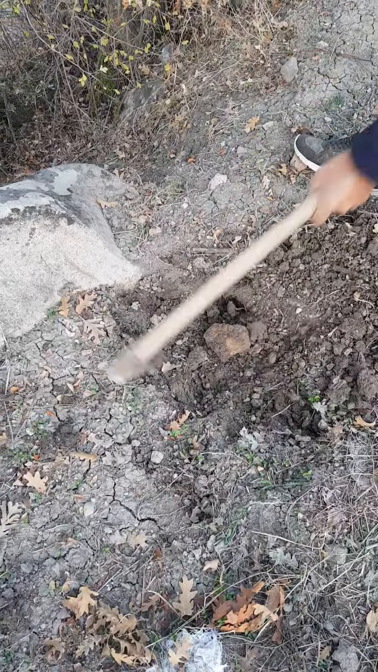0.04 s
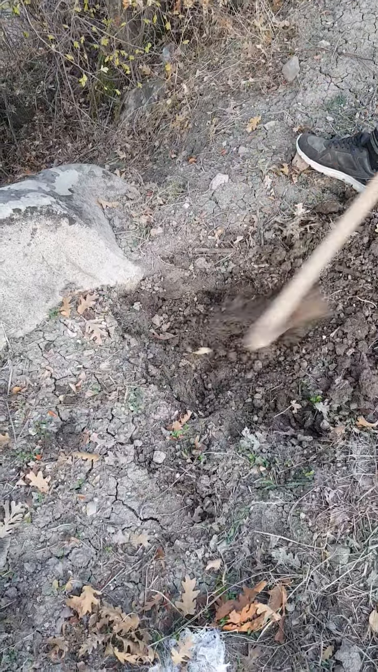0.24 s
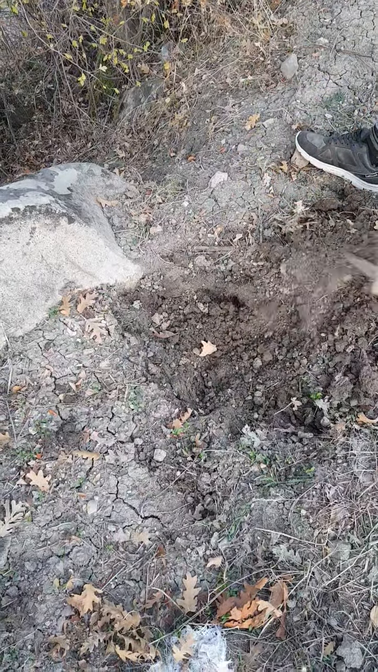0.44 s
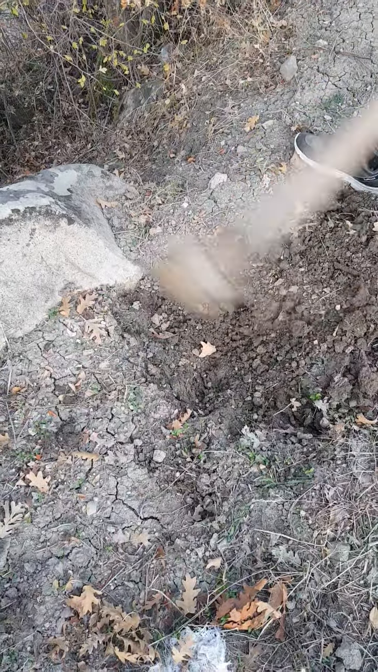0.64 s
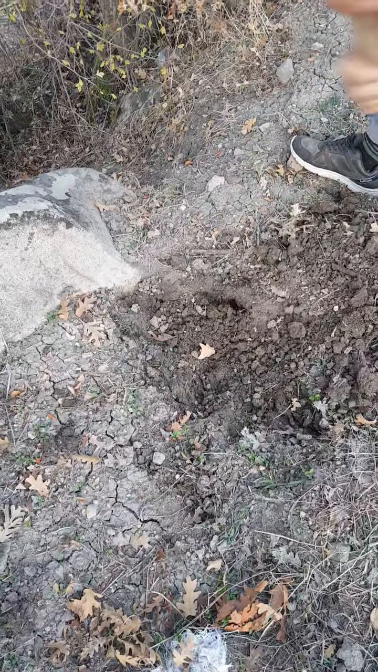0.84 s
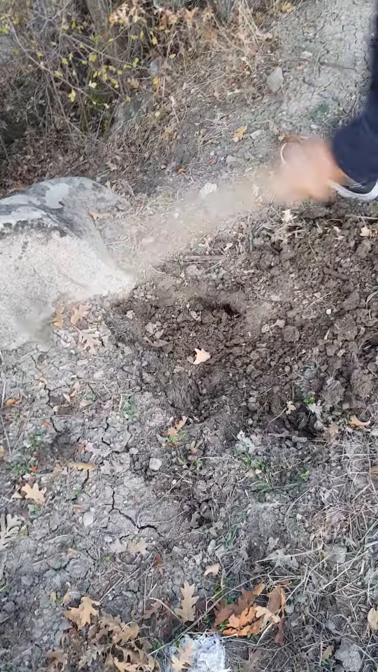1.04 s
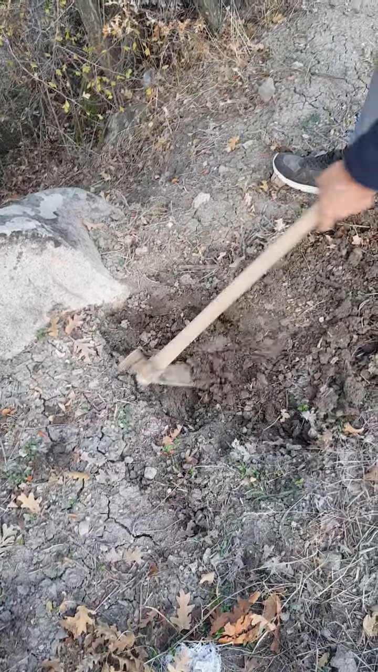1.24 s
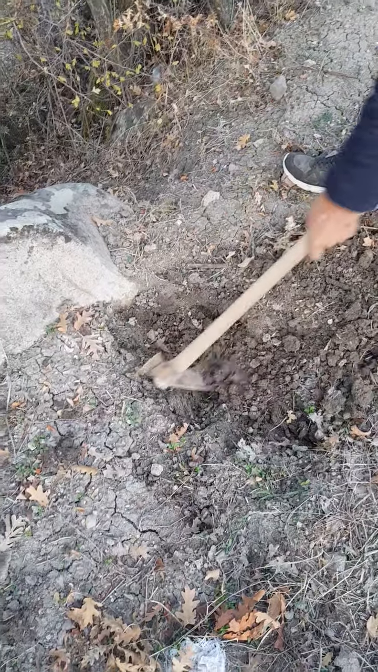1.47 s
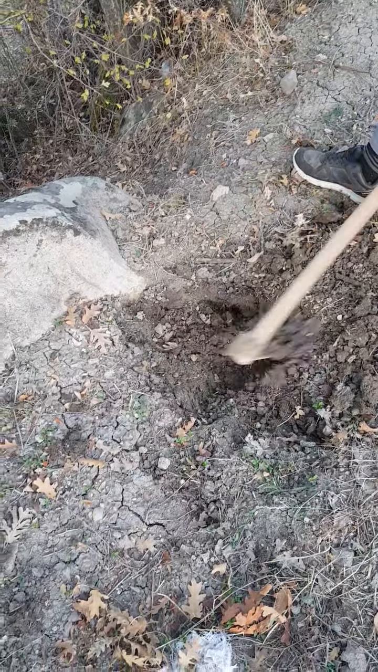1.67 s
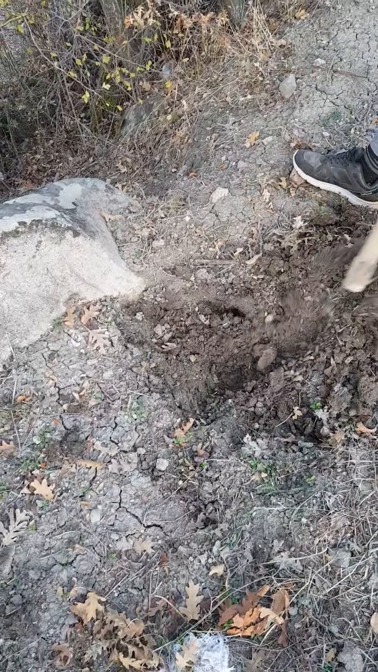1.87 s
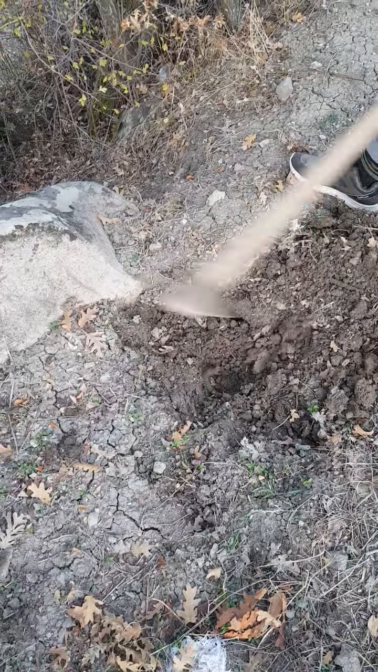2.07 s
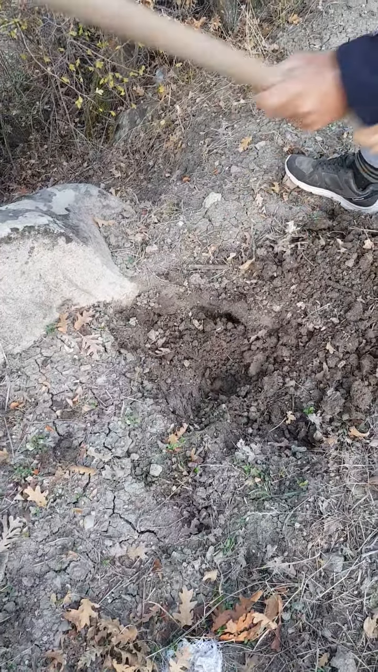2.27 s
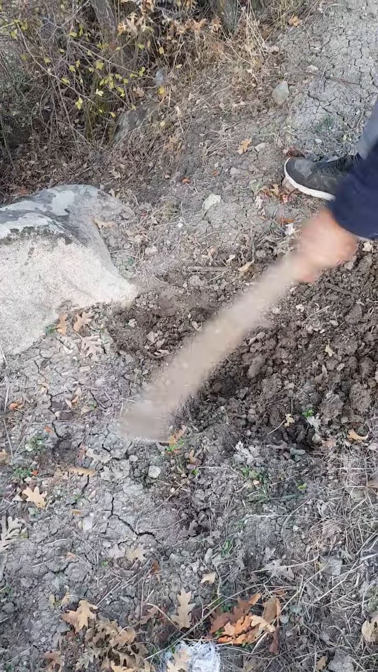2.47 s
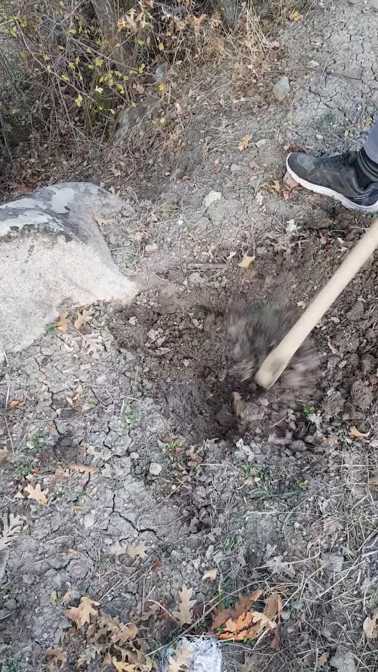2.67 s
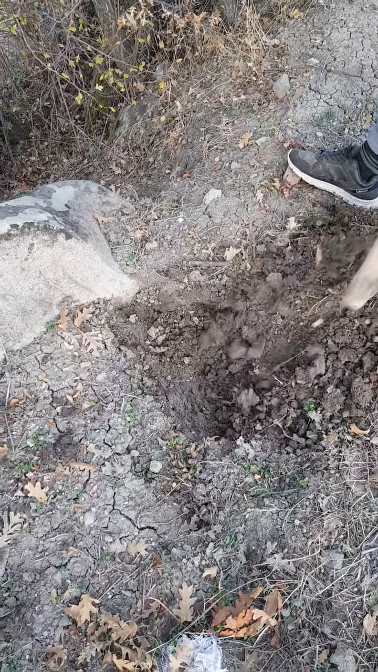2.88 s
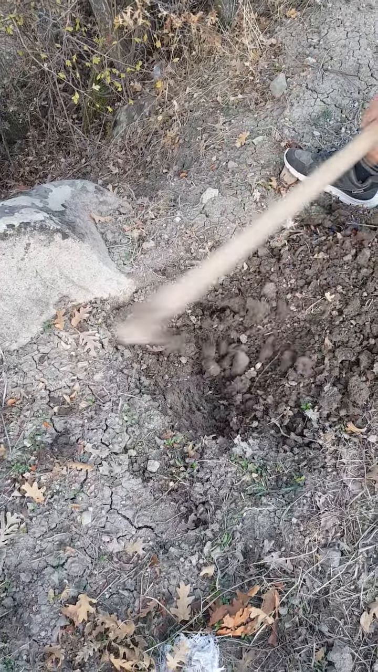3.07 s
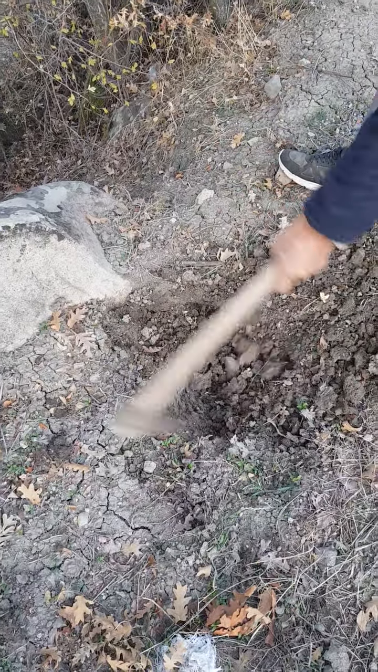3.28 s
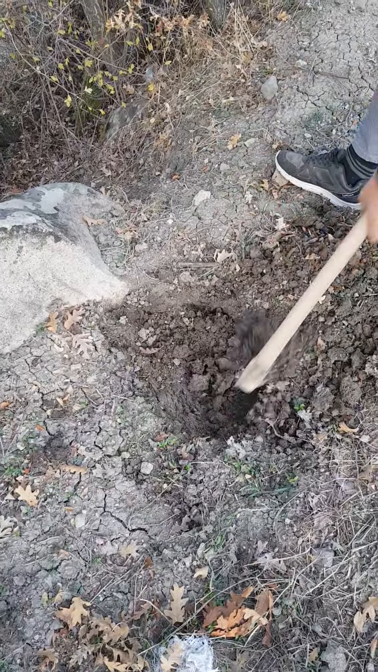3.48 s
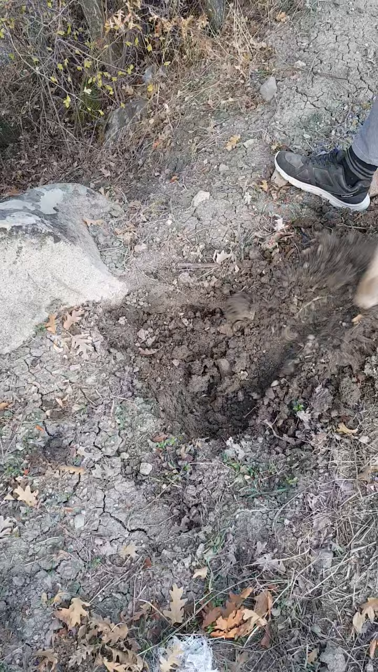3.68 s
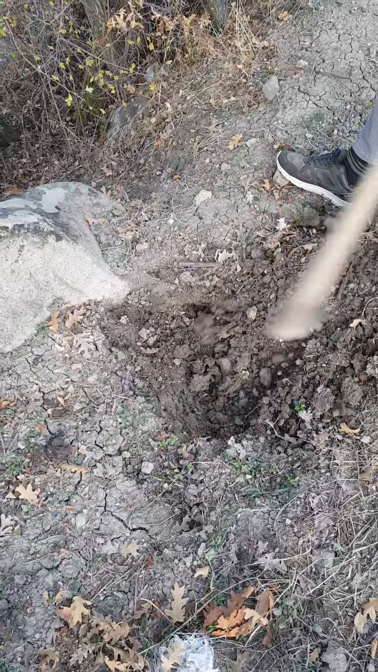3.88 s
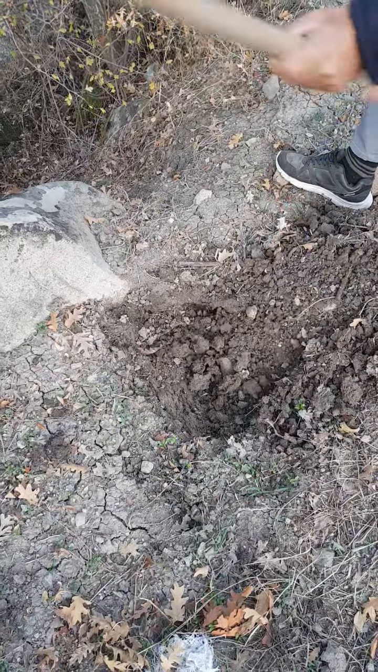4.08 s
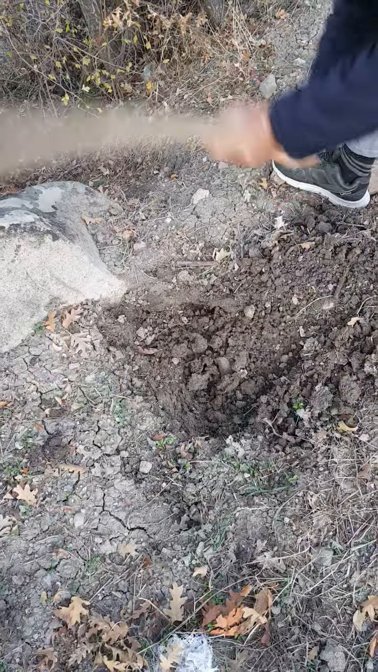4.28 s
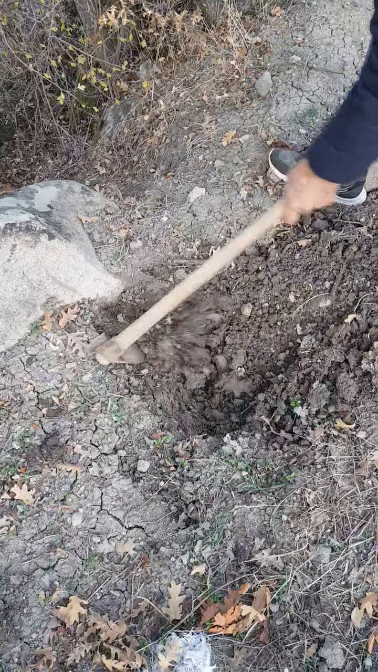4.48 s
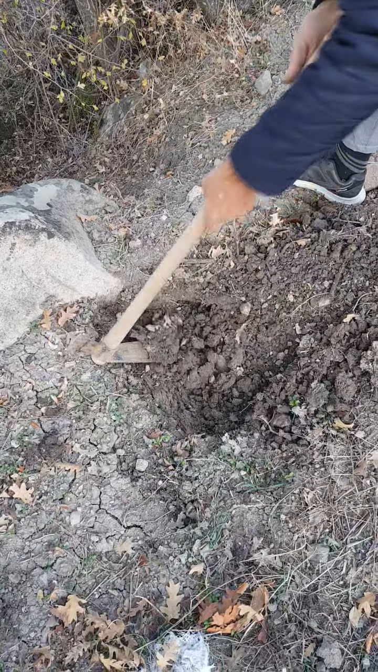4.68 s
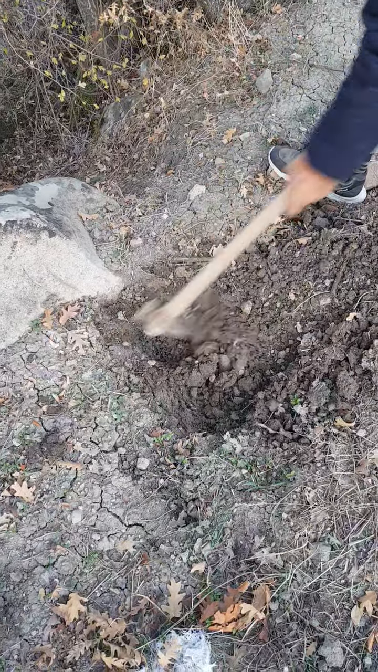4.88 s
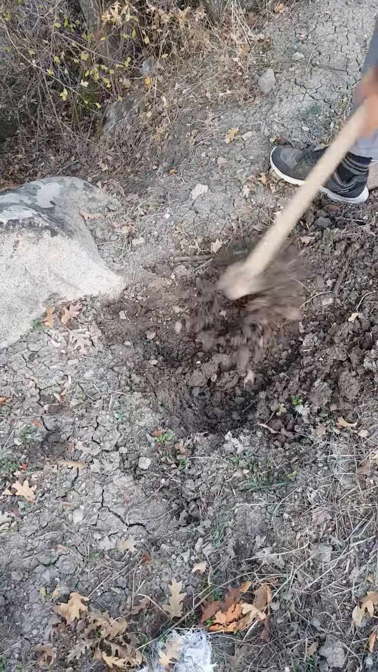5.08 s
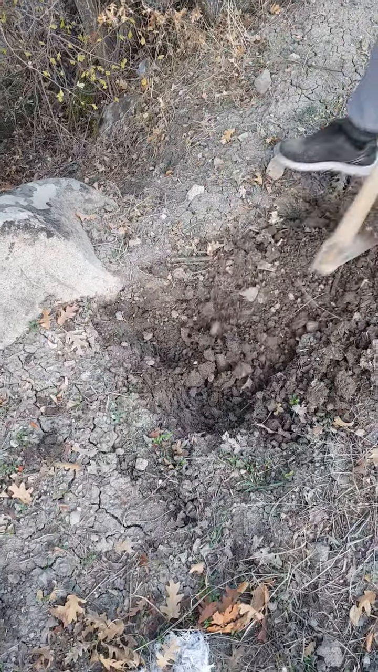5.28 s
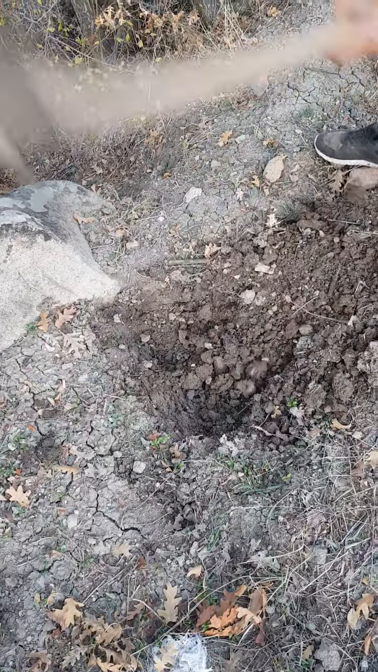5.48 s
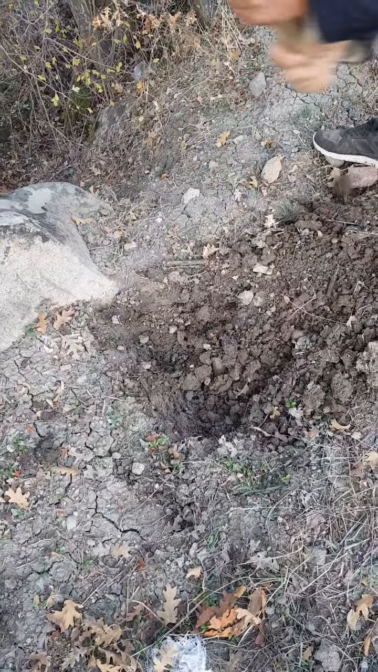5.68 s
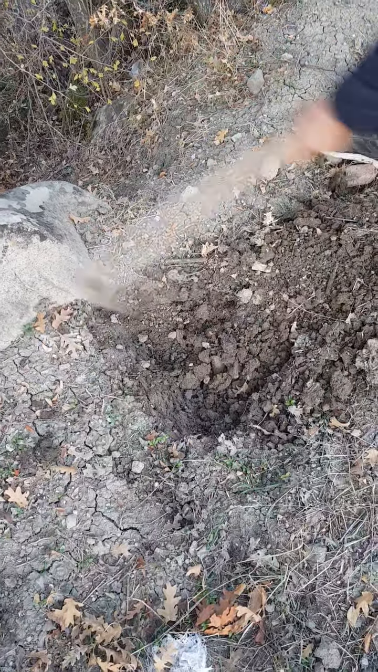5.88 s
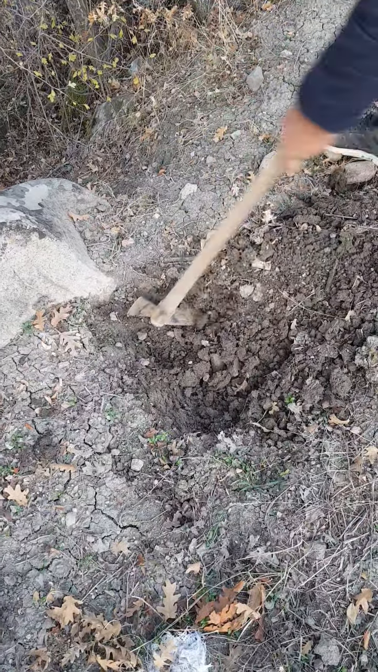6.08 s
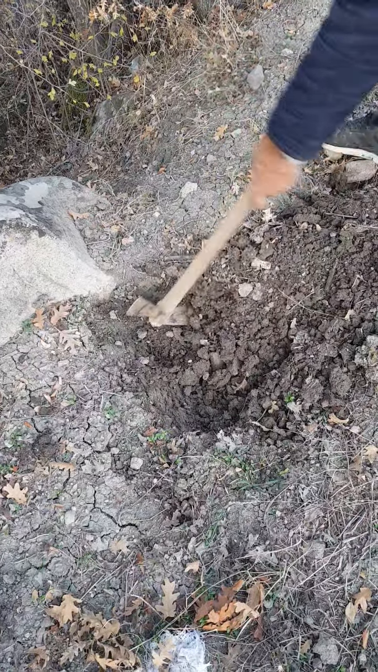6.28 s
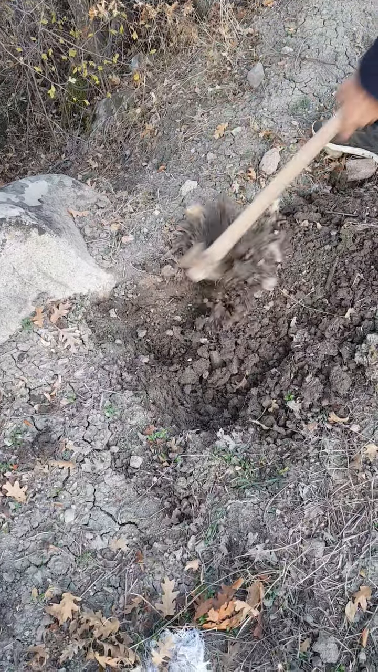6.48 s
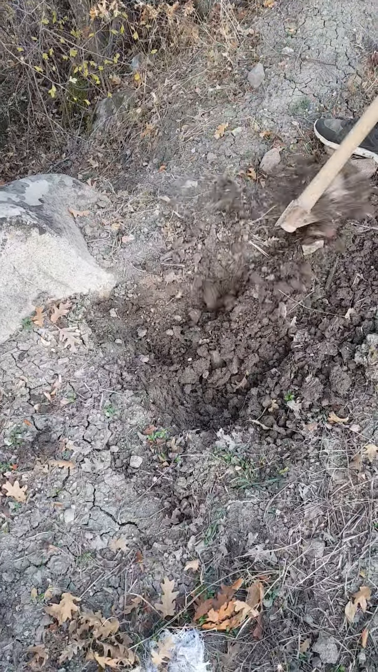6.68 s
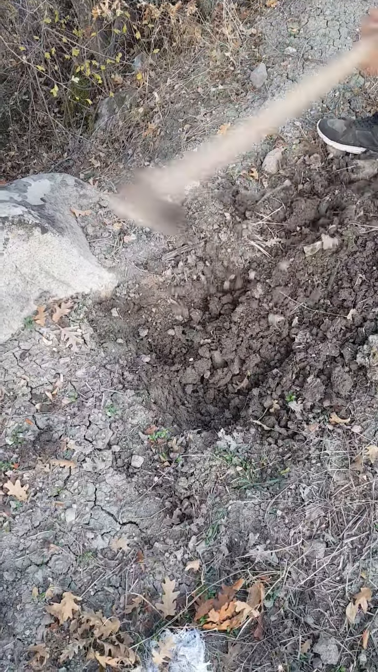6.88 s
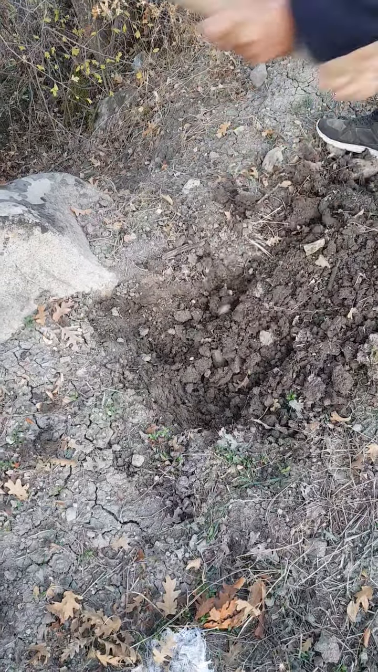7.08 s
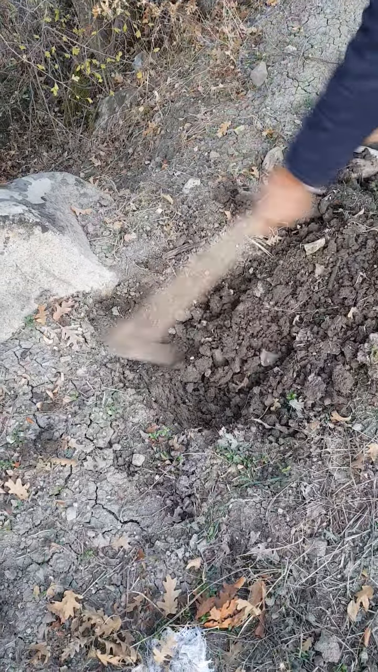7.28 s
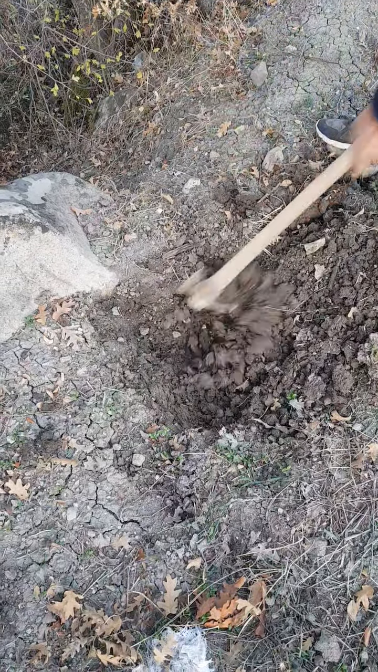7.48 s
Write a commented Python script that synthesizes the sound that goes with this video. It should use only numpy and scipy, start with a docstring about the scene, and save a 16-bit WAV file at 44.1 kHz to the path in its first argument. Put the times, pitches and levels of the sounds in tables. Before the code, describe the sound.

Close, dry outdoor digging with no noticeable echo. A metal blade bites crusty earth in short crunches with low ground thumps, the second and third blows loudest and most metallic. Between them soil is dragged and scattered in grainy swishes, strongest in the later part, with small stones ticking and clods crumbling. Quiet low rumble of footing and grip runs beneath, and the digging is still going on at the end.

```python
"""Outdoors, on hard dry ground close to a pair of microphone ports, a hoe chops and drags loose soil back.
Each blow is a few bursts of random grains that excite blade resonances and bands of grit and clod knock, over
low decaying sines from the ground; one faint burst is a soft hiss of soil. Between blows, sparse random
impulses in bands make pouring grit, short grain bursts make the ticks of pebbles, clods or light touches of
the blade, and low noise swells with steps and movement."""
import sys
import numpy as np
from scipy import signal
from scipy.fft import rfft, irfft
from scipy.io import wavfile

SR = 44100
rng = np.random.default_rng(int(sys.argv[2]) if len(sys.argv) > 2 else 0)


def materialize(psi):
    """Save the field psi as 16-bit PCM at rate SR to the path in sys.argv[1].

    A 1-D psi becomes a single channel; in a 2-D psi each row is a channel.
    """
    bounded = np.clip(np.atleast_2d(psi).T, -1, 1)
    quanta = np.round(bounded * 32767).astype(np.int16)
    wavfile.write(sys.argv[1], SR, quanta)


N = 332073  # length [samples]

# A step or shift of grip shakes the ground and the hands:
# (time [s], hold [s], deep thumping level [dB], shuffling level [dB])
STEPS = [(0.0, 0.13, -63, -62.5), (0.29, 0.0063, -53.5, -70.5), (0.72, 0.025, -59.5, -64),
         (1.29, 0.014, -59, -69), (1.52, 0.15, -89, -67.5), (1.76, 0.02, -65.5, -64),
         (2.78, 0.012, -63, -71), (3.58, 0.037, -63, -72.5), (3.97, 0.027, -68, -81.5),
         (4.75, 0.4, -76.5, -70), (5.1, 0.12, -69.5, -73.5), (5.44, 0.022, -58, -70),
         (5.75, 0.032, -66.5, -67.5), (6.08, 0.12, -69, -66), (6.57, 0.012, -59, -71),
         (6.9, 0.18, -62, -63), (7.4, 0.06, -60, -66)]
STEP_RISE_DB_PER_S, STEP_FALL_DB_PER_S = 67, 70.5
# Rumble between steps: (thumping level [dB], shuffling level [dB])
STEP_REST_DB = (-75.5, -82.5)

# A load of loose soil slides or is dragged:
# (time of full flow [s], hold [s], fine grit level [dB], crumb level [dB])
SOIL_SLIDES = [(0.0, 0.19, -56.5, -64), (0.28, 0.21, -52.5, -61.5), (0.6, 0.35, -51.5, -60),
               (1.18, 0.019, -54.5, -61.5), (1.45, 0.12, -57, -70), (1.72, 0.078, -55.5, -63.5),
               (2.14, 0.021, -52.5, -65), (2.58, 0.11, -57.5, -57.5), (2.75, 0.011, -46.5, -54),
               (3.06, 0.017, -54, -63), (3.38, 0.066, -62.5, -68), (3.6, 0.081, -53, -63),
               (3.93, 0.0085, -54, -66.5), (4.15, 0.015, -63, -76.5), (4.46, 0.5, -62.5, -72.5),
               (5.09, 0.19, -50, -59), (5.44, 0.0095, -42, -57), (5.73, 0.007, -48, -61),
               (6.0, 0.21, -59, -64), (6.28, 0.013, -56, -73.5), (6.5, 0.2, -42, -54.5),
               (6.82, 0.021, -41.5, -52), (7.1, 0.051, -53.5, -63), (7.37, 0.21, -55.5, -64)]
SOIL_RISE_DB_PER_S, SOIL_FALL_DB_PER_S = 112.5, 69
# Soil that trickles on: (fine grit level [dB], crumb level [dB])
SOIL_REST_DB = (-84.5, -88.5)
# Where the soil runs: (time [s], lag of the left port [ms])
SOIL_LAG = [(0.3, -0.049), (0.6, -0.1), (0.9, 0.15), (1.2, -0.034), (3.0, -0.14), (4.5, 0.05), (6.0, -0.1),
            (6.9, -0.12), (7.2, -0.077)]

# A short tick: a pebble, a clod or a light touch of the blade:
# (time [s], relative level [dB], band frequency [Hz])
TICKS = [(0.269, -35.5, 5770), (0.457, -27.5, 1660), (0.483, -40, 1960), (0.549, -36, 9800),
         (0.615, -30, 9100), (0.689, -29, 11400), (0.741, -36, 8900), (0.922, -33.5, 5900),
         (1.118, -38, 2978), (1.453, -48, 2800), (1.419, -33, 9150), (1.58, -36.5, 4210),
         (2.233, -41, 2910), (2.665, -27, 5000), (2.67, -23.5, 6230), (2.675, -23, 5950),
         (2.680, -25.5, 2500), (2.902, -39, 5140), (3.05, -34.5, 9230), (4.482, -37, 13100),
         (4.508, -39.5, 11840), (4.578, -39, 4970), (4.586, -30.5, 12400), (4.686, -30.5, 10500),
         (4.805, -41, 4670), (4.909, -45, 2470), (4.95, -44.5, 5000), (5.215, -33, 8550),
         (5.275, -26, 1100), (5.383, -28.5, 12160), (5.748, -34, 8700), (6.152, -29, 2600),
         (6.186, -35.5, 7280), (6.293, -36.5, 7700), (6.471, -34, 3420), (6.662, -35, 6030),
         (6.854, -34, 6140), (7.183, -31, 9040), (7.309, -32.5, 7700), (7.381, -31, 2800),
         (7.456, -25, 5560), (7.516, -28.5, 13300)]

# The ground and handle take a blow or a knock:
# (time [s], relative level [dB], starting frequency [Hz], decay by 60 dB [s])
THUDS = [(0.126, -27.5, 227, 0.061), (0.289, -37, 101, 0.062), (0.641, -33, 111, 0.081),
         (1.1312, -9.5, 143.4, 0.061), (1.136, -8.5, 309, 0.013), (1.144, -23.5, 89, 0.12),
         (1.755, -46, 112.7, 0.046), (2.534, -14.5, 165, 0.043), (3.357, -44, 88, 0.085),
         (3.933, -41, 61.5, 0.23), (4.414, -23.5, 213, 0.051), (4.419, -32, 79.7, 0.1),
         (5.9481, -13, 121, 0.055), (5.961, -22.5, 70.5, 0.13), (7.332, -20, 164, 0.053),
         (7.34, -23, 88, 0.047)]

# The blade meets crust or stone, or a surge of soil hisses softly; levels relative within each column:
# (time [s], blade level [dB], clod knock level [dB], grit level [dB], grit frequency [Hz],
#  crunch decay by 60 dB [s], lag of the left port [ms])
CRUNCHES = [(0.102, -58, -53, -34, 6000, 0.2, 0.076), (0.127, -45, -34.5, -20, 6800, 0.03, -0.03),
            (0.631, -59, -48, -32.5, 9200, 0.088, -0.09), (1.1286, -29.5, -49, -19, 3880, 0.1, 0.069),
            (1.1358, -4.5, -5, -18, 5890, 0.011, 0.0018), (2.518, -32.5, -27, -17.5, 12300, 0.022, 0.074),
            (2.529, -15, -41.5, -11.5, 4840, 0.0073, 0.046), (2.5311, 0.5, -42, -19, 8940, 0.021, 0.078),
            (2.534, -8.5, -35, -22, 4470, 0.015, 0.075), (3.354, -19, -57, -19, 6000, 0.018, 0.044),
            (4.407, -36, -41.5, -28.5, 4512, 0.075, -0.011), (4.4173, -19.5, -24, -27, 5340, 0.013, -0.021),
            (5.944, -32.5, -20, -31.5, 4680, 0.085, -0.037), (5.949, -51, -22.5, -45, 11730, 0.049, -0.25),
            (6.779, -55, -75, -37, 6920, 0.18, -0.16), (7.329, -27, -23.5, -5.5, 5640, 0.0063, -0.03),
            (7.333, -38, -15.5, -40, 7300, 0.031, -0.066), (7.345, -39, -14.5, -30.5, 6300, 0.011, -0.11)]
# Resonances of the blade: (frequency [Hz], relative level [dB], decay by 60 dB when free [s])
BLADE_MODES = [(1124, -5, 0.07), (1840, -8, 0.02), (2210, 2, 0.028), (2472, -3, 0.028), (2800, 1, 0.045),
               (3500, -10, 0.025)]
# Clods that knock loudly hold the blade and change its decay; it is free this far above the knock
BURIED_T60_S, FREE_ABOVE_KNOCK_DB = 0.022, 25

# Resonances and dips of the microphone: (frequency [Hz], width [Hz], gain [dB])
MICROPHONE = [(3840, 1900, -4.5), (6060, 1800, 3), (8990, 3500, -7), (11800, 1200, 3.5)]
PORT_SIDE = np.array([[.5], [-.5]])  # left, right: half of any difference goes to each
SHADOW_DB_PER_MS = -16  # the port that hears a sound first hears it louder
LOW_LEAN_DB = 3  # knocks and the higher thuds are louder at the left port
STOP_HZ = 16150  # from here up the treble is at least 60 dB down


def from_db(db):
    """Decibel law: amplitude gain of a level."""
    return 10 ** (np.asarray(db) / 20)


def rms_one(x):
    """Normalization of mean power: scales to rms 1."""
    return x / np.sqrt(np.mean(x ** 2) + 1e-20)


def in_time(rows):
    """Linear interpolation: columns of a table at every sample."""
    times, *columns = np.transpose(rows)
    return [np.interp(np.arange(N) / SR, times, column) for column in columns]


def band(x, low_hz, high_hz, order=2):
    """Band-pass filtering with a Butterworth response."""
    edges = [low_hz, min(high_hz, .45 * SR)]
    return signal.sosfilt(signal.butter(order, edges, "band", fs=SR, output="sos"), x)


def drift(rate_hz):
    """Low-passed noise: a slow random course with rms 1."""
    step = 40  # samples between computed points
    pole = np.exp(-2 * np.pi * rate_hz * step / SR)
    noise = rng.standard_normal(N // step + 2002)
    slow = signal.lfilter([1], [1, -2 * pole, pole * pole], noise)[2000:]
    return np.interp(np.arange(N) / step, np.arange(len(slow)), rms_one(slow))


def ring(x, hz, t60):
    """Damped resonance: a unit click sets a decaying sine of starting height 1 ringing."""
    radius = from_db(-60 / (t60 * SR))
    w = 2 * np.pi * hz / SR
    return signal.lfilter([0, np.sin(w)], [1, -2 * radius * np.cos(w), radius * radius], x)


def uneven(shape, spread_db):
    """Exponential statistics of grain strength in decibels, with random polarity."""
    strength = from_db(spread_db * np.minimum(rng.exponential(1, shape), 5))
    return strength * rng.choice([-1, 1], shape)


def swells(rows, rise_db_per_s, fall_db_per_s, rest_db):
    """Addition of powers: levels in dB of events that rise, hold and fall over a resting level."""
    t = np.arange(0, N + 64, 64) / SR
    power = from_db(2 * np.array(rest_db))[:, None]
    for start, hold_s, *peak_db in rows:
        before = np.maximum(start - t, 0)
        past = np.maximum(t - start - hold_s, 0)
        loss_db = rise_db_per_s * before + fall_db_per_s * past
        power = power + from_db(2 * (np.array(peak_db)[:, None] - loss_db))
    return [np.interp(np.arange(N) / SR, t, 10 * np.log10(p)) for p in power]


def add_at_ports(out, start, sound, lag_ms):
    """Localization by time and level difference: the left port is delayed and shaded against the right."""
    size = sound.shape[1]
    hz = np.fft.rfftfreq(size, 1 / SR)
    side_ms = PORT_SIDE * lag_ms
    # 0.5 ms of common delay leaves room for a lead; the early start makes up for it
    delay = np.exp(-2j * np.pi * hz * (side_ms + .5) / 1000)
    at = round((start - .0005) * SR)
    placed = from_db(SHADOW_DB_PER_MS * side_ms) * irfft(rfft(sound) * delay, size)
    out[:, at:at + size] += placed[:, :N - at]


def crunch(size, t60, unlike, tail_db, tail_t60, snap):
    """Granular fracture: a burst of breaking grains and its crumbling, partly unlike at the two ports."""
    t = np.arange(size) / SR
    shared, left, right = uneven((3, size), spread_db=3.5)
    grains = (np.sqrt(1 - unlike) * shared + np.sqrt(unlike) * np.array([left, right])) / 2
    rise = 1 - np.exp(-t / (0.053 * t60 ** 2))  # a long scuff sets in softly, a short blow snaps
    burst = grains * rise * from_db(-60 * t / t60)
    burst[:, 0] = min(snap, 0.0006 / t60 ** 2)
    crumbling = grains * rise * from_db(tail_db - 60 * t / tail_t60)
    return burst, crumbling * np.hanning(2 * size)[size:]


def rumble():
    """Structure-borne noise: lumpy lows through ground and hands, nearly alike left and right."""
    deep_db, shuffle_db = swells(STEPS, STEP_RISE_DB_PER_S, STEP_FALL_DB_PER_S, STEP_REST_DB)
    mid, side = rng.standard_normal((2, 2, N))
    opposite = np.array([[1], [-1]])
    deep = band(mid[0] + from_db(-10.0) * side[0] * opposite, 15, 120)
    shuffle = band(mid[1] + from_db(-11.5) * side[1] * opposite, 120, 340)
    deep = from_db(deep_db + 2.0 * drift(17.0)) * rms_one(deep)
    return deep + from_db(shuffle_db + 2.0 * drift(33)) * rms_one(shuffle)


def pouring(low_hz, high_hz, per_s, spread_db, scatter_ms, diffuse, patchy_db=1.75, count=5):
    """Shot noise: random grain impulses around where the soil runs, in bands that waver separately."""
    out, lag_ms = np.zeros((2, N)), in_time(SOIL_LAG)[0]
    edges_hz = np.geomspace(low_hz, high_hz, count + 1)
    for low, high in zip(edges_hz, edges_hz[1:]):
        lag = lag_ms + scatter_ms * rng.standard_normal(N)
        sizes = uneven(N, spread_db)
        falls = rng.random(N) < per_s / count / SR
        impulses = np.sqrt(1 - diffuse) * rms_one(sizes * falls)
        # a share of the power is noise independent at the two ports
        grains = np.sqrt(diffuse) * rng.standard_normal((2, N))
        late = np.clip(np.arange(N) + np.round(lag * SR / 1000).astype(int), 0, N - 1)
        grains[0] += np.bincount(late, impulses * from_db(SHADOW_DB_PER_MS * lag / 2), N)
        grains[1] += impulses * from_db(-SHADOW_DB_PER_MS * lag / 2)
        out += band(grains, low, high) * from_db(patchy_db * drift(10))
    return rms_one(out)


def soil():
    """Granular flow: fine grit, crumbs and stray stones follow the slides of soil."""
    grit_db, crumbs_db = swells(SOIL_SLIDES, SOIL_RISE_DB_PER_S, SOIL_FALL_DB_PER_S, SOIL_REST_DB)
    clumps_db = 1.6 * drift(23) + 1.0 * drift(61)  # soil slides off in clumps
    grit = pouring(3800, 17500, per_s=6600, spread_db=-1.0, scatter_ms=0.048, diffuse=0.089)
    crumbs = pouring(410, 4200, per_s=2500, spread_db=0.0, scatter_ms=0.042, diffuse=0.7, patchy_db=2.5)
    crumbs = crumbs + from_db(-3.5) * band(crumbs, 1400, 3500)  # most crumbs are of a middle size
    # single stones roll free
    strays = pouring(2000, 7300, per_s=150, spread_db=3.5, scatter_ms=.08, diffuse=0, count=2)
    flow = from_db(grit_db + clumps_db) * grit + from_db(crumbs_db + clumps_db) * crumbs
    return flow + from_db(grit_db - 14.0) * strays


def ticks():
    """Light impact: each pebble, clod or touch of the blade is a tiny crunch in a band of its own."""
    out, lag_ms = np.zeros((2, N)), in_time(SOIL_LAG)[0]
    for start, db, hz in TICKS:
        tick, crumbling = crunch(size=1024, t60=0.012, unlike=1.0, tail_db=-11, tail_t60=0.11, snap=2.5)
        body = band(tick + crumbling, hz / 1.61, hz * 1.4)
        click = 0.38 * band(tick, hz / 3, 15000, order=1)
        add_at_ports(out, start, from_db(db) * (body + click), lag_ms[round(start * SR)])
    return out


def thuds():
    """Damped oscillation: a soft push rings the ground, unsteadily as the soil gives way."""
    out, t = np.zeros((2, N + SR)), np.arange(SR // 2) / SR
    unsteady = from_db(1.2 * drift(45))
    for start, db, hz, t60 in THUDS:
        rise = 1 - np.exp(-t / (0.28 * t60 ** 2))  # a long-lasting shudder swells in
        # the pitch sinks for 0.1 s as the soil loosens, then stays about 5 % below its start
        cycles = hz * t * (1 - 0.54 * np.minimum(t, .1))
        # the longest waves reach both ports alike
        lean_db = LOW_LEAN_DB * np.clip(np.log2(hz / 130), 0, 1) * PORT_SIDE
        decay = from_db(db + lean_db - 60 * t / t60)
        at = round(start * SR)
        out[:, at:at + len(t)] += decay * rise * np.sin(2 * np.pi * cycles)
    return out[:, :N] * unsteady


def blade_sound(burst, crumbling, blade_db, knock_db):
    """Modal excitation: the crunch sets the blade ringing, damped by the soil that holds it."""
    strengths_db = rng.normal(0, 2, len(BLADE_MODES))  # each crunch excites the modes differently
    push = 0.7 * burst
    # the first shock of the edge carries most of the push
    push[:, 0] = np.sqrt(np.mean(np.sum(burst ** 2, axis=1)))
    free = np.clip((blade_db - knock_db) / FREE_ABOVE_KNOCK_DB, 0, 1) ** 2
    blade = np.zeros_like(burst)
    for (hz, db, free_t60), strength_db in zip(BLADE_MODES, strengths_db):
        t60 = BURIED_T60_S + free * (free_t60 - BURIED_T60_S)
        blade += from_db(db - 27 + strength_db) * ring(push, hz, t60)
    crack = from_db(-5.0) * band(burst, 1300, 3200, order=1)  # the damped edge also cracks broadly
    crust = from_db(9.0) * band(crumbling, 1800, 4500, order=1)  # the broken crust crumbles
    return blade + crack + crust


def crunches():
    """Impact and fracture: blade contacts and a soft surge of soil, heard as blade, clod knock and grit."""
    out = np.zeros((2, N))
    for start, blade_db, knock_db, grit_db, grit_hz, t60, lag_ms in CRUNCHES:
        burst, crumbling = crunch(size=8192, t60=t60, unlike=0.54, tail_db=-16.5, tail_t60=0.09, snap=6.0)
        force = burst + crumbling
        blade = blade_sound(burst, crumbling, blade_db, knock_db)
        grit = band(force, grit_hz / 1.43, grit_hz * 1.255) + band(force, 1900, 12000, order=1)
        knock = band(force.mean(axis=0) + 0.043 * force, 120, 1400)  # nearly alike at both ports
        knock = knock * from_db(5.0 + LOW_LEAN_DB * PORT_SIDE)
        sound = from_db(blade_db) * blade + from_db(knock_db) * knock + from_db(grit_db + 0.5) * grit
        add_at_ports(out, start, sound, lag_ms)
    return out


def scene():
    """Superposition: pouring soil, crunches, thuds, ticks and rumble add linearly."""
    return soil() + crunches() + thuds() + ticks() + rumble()


def record(dry):
    """Linear filtering and saturation: treble coloured, deep bass lost, peaks rounded, top cut."""
    for hz, width_hz, db in MICROPHONE:
        w, gain = 2 * np.pi * hz / SR, from_db(db / 2)
        a = np.sin(w) * width_hz / hz / 2
        numerator = [1 + a * gain, -2 * np.cos(w), 1 - a * gain]
        denominator = [1 + a / gain, -2 * np.cos(w), 1 - a / gain]
        dry = signal.lfilter(numerator, denominator, dry)
    # small ports lose the deepest bass
    dry = signal.sosfilt(signal.butter(3, 44, "high", fs=SR, output="sos"), dry)
    steep = signal.cheby2(24, 60, STOP_HZ, fs=SR, output="sos")
    return signal.sosfilt(steep, 1.173 * np.tanh(dry / 1.23))


dry = scene()
out = record(dry)
materialize(out)
```